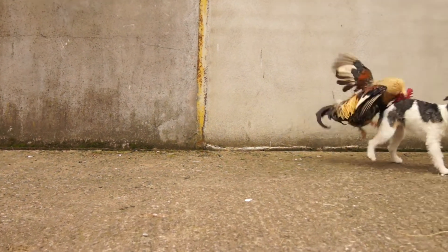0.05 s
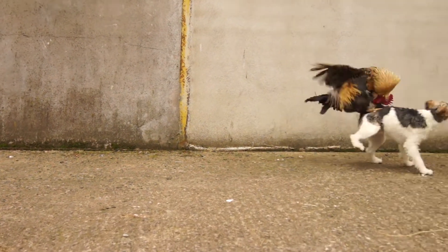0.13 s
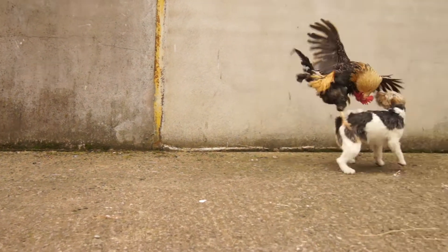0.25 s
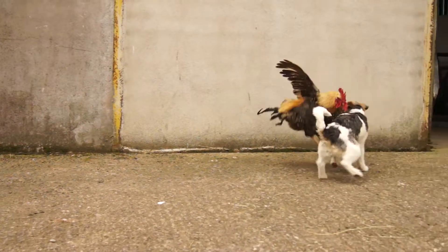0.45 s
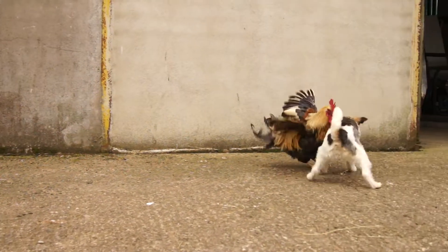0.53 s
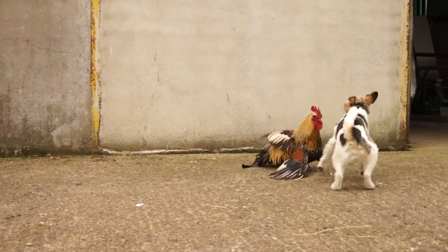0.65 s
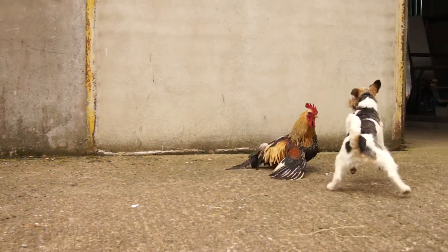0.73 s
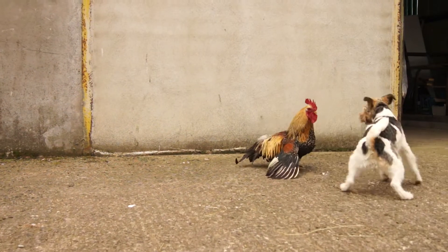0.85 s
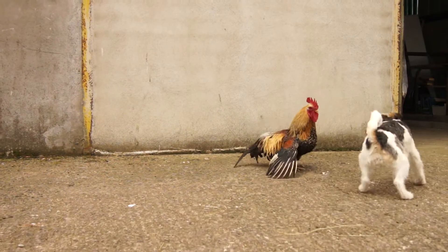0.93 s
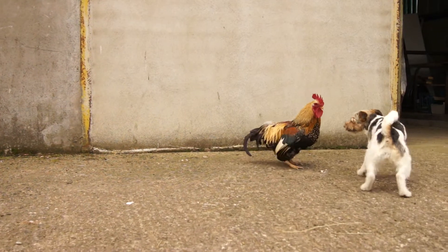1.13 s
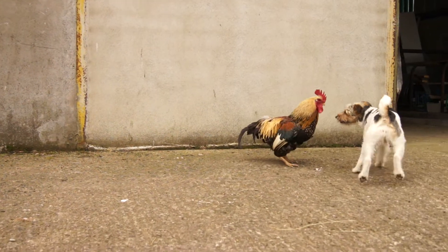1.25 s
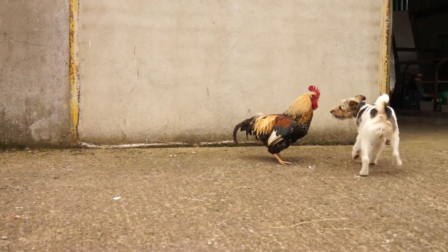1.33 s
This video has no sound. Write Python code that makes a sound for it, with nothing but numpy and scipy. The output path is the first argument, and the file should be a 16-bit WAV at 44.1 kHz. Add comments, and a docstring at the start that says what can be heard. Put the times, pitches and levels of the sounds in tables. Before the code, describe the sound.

A rooster's wings flap and slap sharply, then faint scuffling on concrete outdoors.

```python
"""A rooster leaps at a small dog in a concrete yard, heard on a stereo pair of microphones.
A soft wing beat leads to one sharp slap, a second blow and a landing thud: quills crack, cupped air
rings, wings and bodies thump. Feathers rustle, claws scuff the grit and one animal gives a tiny squeak.
Ground and walls echo the scuffle. Beyond it lie thin chirps, a high twitter, one far hoot and a hush."""
import sys
import numpy as np
from scipy import signal
from scipy.fft import rfft, irfft
from scipy.io import wavfile
from scipy.ndimage import uniform_filter1d

SR = 44100
rng = np.random.default_rng(int(sys.argv[2]) if len(sys.argv) > 2 else 0)


def materialize(psi):
    """Save the field psi as 16-bit PCM at rate SR to the path in sys.argv[1].

    A 1-D psi becomes a single channel; in a 2-D psi each row is a channel.
    """
    bounded = np.clip(np.atleast_2d(psi).T, -1, 1)
    quanta = np.round(bounded * 32767).astype(np.int16)
    wavfile.write(sys.argv[1], SR, quanta)


N = 61739

# wing slaps in the foreground: t/s, crack level/dB, attack/s, hold/s, release/s, relative ring level/dB
WING_SLAPS = [(0.2318, -20.5, .0002, .003, .0045, -23), (0.2706, -28.5, .003, .005, .0045, -41)]
# spectrum of cracking quills: f/Hz, level/dB
QUILL_SPECTRUM = [(150, -44.5), (400, 4), (900, -13), (1400, -5), (2300, -6), (4200, -4.5), (6500, -0.5),
                  (10000, -16.5), (13500, -4)]
# resonances of the air under the wing: f/Hz, width/Hz, relative level/dB
WING_CAVITY = [(505, 170, 2), (700, 98, 6.5), (1040, 280, -5.5), (1728, 155, 2), (2873, 93, 14.5),
               (4140, 200, 5.5), (4840, 100, 4)]
def wing_slaps():
    """Quills strike in a dense volley and ring the air cupped under the wing."""
    quills = unit(colour(spread(grains(per_s=9000, spread_db=4), width=.65), QUILL_SPECTRUM))
    crack = quills * strokes(row[:5] for row in WING_SLAPS)
    air = stereo_noise(width=.65)
    push = sum(undb(db) * envelope(s, attack=.0012, hold=.005, release=.002) for s, *_, db in WING_SLAPS)
    hollow = sum(undb(db) * ring(air * push, hz, width) for hz, width, db in WING_CAVITY)
    return crack + 2.78 * hollow


# sharp clicks within the slaps, quill snaps plus, at 0.2336 s, the first snap bouncing off the ground: t/s,
# relative level/dB
QUILL_SNAPS = [(0.2319, 0), (0.2336, 6), (0.2399, -2), (0.2753, -12)]
def quill_snaps():
    """The stiffest quills each snap with one hard click; the first snap comes back off the ground a moment
    later."""
    return colour(impulses(QUILL_SNAPS), QUILL_SPECTRUM)


# dull beats of wings and bodies: t/s, level/dB, f/Hz, hold/s, puff level/dB
BODY_THUMPS = [(0.149, -61, 396, 0.0099, -51), (0.195, -42, 367, 0.0018, -58),
               (0.2111, -45, 384, 0.0056, -33), (0.2386, -37, 480, 0.0028, -28),
               (0.2705, -32, 361, 0.0079, -35.5), (0.353, -45, 348, 0.0118, -50.5),
               (0.556, -42, 399, 0.01, -47.5), (0.662, -70, 385, 0.012, -75)]
# spectrum of the puff of air: f/Hz, level/dB
PUFF_SPECTRUM = [(25, -8.5), (55, -29), (110, -19), (170, -16), (240, 7.5), (400, 5), (570, -3.5), (720, 2),
                 (1300, -15), (3000, -23), (9000, -39)]
def body_thumps():
    """Each beat is a few uneven, sagging low cycles with a puff of air."""
    air = unit(colour(stereo_noise(), PUFF_SPECTRUM))
    wobble = 1 + .09 * walk(500)
    sag_per_s = 6
    out = 0
    for start, db, hz, hold, puff_db in BODY_THUMPS:
        t = np.maximum(since(start), 0)
        pitch = hz * wobble * np.exp(-sag_per_s * t) * (t > 0)
        beat = undb(db) * sine(pitch) + undb(puff_db) * air
        out += beat * envelope(start, attack=.002, hold=hold, release=.0022)
    return out


# rustles of the rooster's plumage: t/s, level/dB, attack/s, hold/s, release/s
RUSTLES = [(0.09, -50.5, 0.034, 0.11, 0.023), (0.214, -35, 0.0049, 0.0027, 0.0078),
           (0.282, -48.5, 0.0031, 0.01, 0.074), (0.335, -77, 0.019, 0.068, 0.068),
           (0.5545, -41.5, .001, 0.0044, 0.0059), (0.582, -55, 0.0067, 0.06, 0.016),
           (0.648, -52.5, 0.011, .012, 0.06), (0.87, -59.5, 0.0085, .12, 0.055),
           (1.145, -61.5, 0.0079, 0.024, 0.012), (1.278, -55, 0.0096, 0.026, 0.01)]
# spectrum of rubbing feathers: f/Hz, level/dB
FEATHER_SPECTRUM = [(100, -27.5), (200, -9.5), (370, 1), (480, -0.5), (580, -18), (740, 5.5), (1000, -2),
                    (1400, -14.5), (2000, -6.5), (2400, -19), (2900, -3), (3400, -12), (4300, -8),
                    (8000, -20), (13500, -25)]
def feathers():
    """Feathers slide over each other in fine, dense clicks."""
    return strokes(RUSTLES) * friction(FEATHER_SPECTRUM, per_s=12000, spread_db=1.5)


# scuffs across the yard floor: t/s, level/dB, attack/s, hold/s, release/s
CLAW_SCUFFS = [(0.005, -51, 0.0015, 0.0079, 0.018), (0.052, -51.5, 0.0012, .03, 0.014),
               (0.16, -52, .002, 0.0024, 0.0046), (0.372, -51.5, 0.0016, .004, 0.0073),
               (0.453, -49.5, 0.0025, 0.029, 0.0054), (0.486, -46, .001, 0.0024, 0.005),
               (0.510, -54.5, 0.0023, 0.0031, 0.025), (0.535, -56, 0.0016, 0.037, .006),
               (0.588, -59.5, .005, 0.044, 0.036), (0.649, -46.5, 0.0085, 0.024, 0.0097),
               (0.683, -54.5, 0.00072, 0.0014, 0.075), (0.805, -54, 0.0014, 0.0022, 0.0051),
               (0.905, -50.5, 0.00094, 0.011, .012), (1.01, -58.5, .004, 0.0083, 0.008),
               (1.283, -65, 0.0035, 0.0083, 0.0054)]
# single claw ticks: t/s, relative level/dB
CLAW_TICKS = [(0.162, -28), (0.454, -29), (0.4875, -22.5), (0.512, -25), (0.5405, -20), (0.5555, -31),
              (0.6275, -46), (0.6845, -31), (0.8065, -31), (0.907, -26)]
# spectrum of grit on concrete: f/Hz, level/dB
GRIT_SPECTRUM = [(120, -17), (300, 2), (1000, -23.5), (2400, -6), (3300, -7.5), (4200, 2), (5400, -4),
                 (6600, -2), (8500, -9.5), (11000, -9), (13500, -7.5)]
def claws():
    """Claws drag through the grit and tick on the concrete."""
    scuffs = strokes(CLAW_SCUFFS) * friction(GRIT_SPECTRUM, per_s=7600, spread_db=2.5)
    return scuffs + colour(impulses(CLAW_TICKS), GRIT_SPECTRUM)


def squeak():
    """One animal in the scuffle gives a tiny falling squeak."""
    return whistle(start=.6125, length=.019, hz=1016, glide_hz_per_s=-3000, db=-44, waver=.017)


# thin chirps around the yard: t/s, f/Hz, level/dB
CHIRPS = [(0.704, 4170, -41), (0.818, 4320, -52), (0.965, 4800, -59), (0.986, 4100, -62),
          (1.018, 4280, -68), (1.04, 4470, -62), (1.086, 4050, -61.5)]
def chirps():
    """A few short, high whistles, each sliding upward."""
    return sum(whistle(s, length=.016, hz=hz, glide_hz_per_s=9000, db=db, waver=.03)
               for s, hz, db in CHIRPS)


def hoot():
    """One faint, low hoot sinks in pitch, far from the microphones."""
    return whistle(start=.915, length=.075, hz=445, glide_hz_per_s=-300, db=-61, waver=.011)


def twitter():
    """Distant chirping, blurred by the surroundings into a flickering band of noise."""
    hz, width_hz = 4230, 1350
    voices = ring(ring(stereo_noise(), hz, width_hz), hz, width_hz)
    swell = envelope(start=.78, attack=.15, hold=.11, release=.04)
    return unit(voices) * undb(-57.5 + 3.5 * walk(70)) * swell


# reflections off ground and walls: delay/s, level/dB, extra delay at the left microphone/s
YARD_ECHOES = [(.0062, -12, .00005), (.0195, -19, .00008)]
# spectrum of the yard's reverberation: f/Hz, level/dB
YARD_SPECTRUM = [(60, -11), (160, 9.5), (240, 1), (330, -0.5), (460, 1), (580, 1.5), (720, 5.5),
                 (1000, 6.5), (1400, -2), (2000, -1.5), (2900, -6), (4500, -3), (9000, -4), (14000, -7.5)]
def yard(x):
    """Hard surfaces add two early reflections and a short diffuse tail to the direct sound."""
    t60_s, tail_db = .61, -9.5
    early = sum(undb(db) * np.array([delay(x[0], s + lag), delay(x[1], s)]) for s, db, lag in YARD_ECHOES)
    tail = stereo_noise() * envelope(0, attack=.0074, hold=0, release=t60_s / np.log(1000))
    tail = colour(unit(tail) / np.sqrt(N), YARD_SPECTRUM)
    return x + early + undb(tail_db) * signal.fftconvolve(x, tail, axes=1)[:, :N]


# spectrum of the open air around the yard: f/Hz, level/dB
HUSH_SPECTRUM = [(15, 6.5), (50, -11), (130, -14), (200, -12), (300, -12.5), (480, 1), (620, -9),
                 (800, 0.5), (1050, -0.5), (1350, -15), (1800, -3), (2000, -9.5), (2180, 3.5),
                 (2400, -29.5), (2600, -4.5), (2900, -7.5), (3450, -16), (3900, -8), (5000, -13.5),
                 (7500, -19.5), (10000, -22), (13500, -27.5)]
def hush():
    """Quiet outdoor air, wavering a little."""
    return undb(-54.5 + .54 * walk(23.8)) * unit(colour(stereo_noise(), HUSH_SPECTRUM))


# stereo width at the microphones, bass and treble: f/Hz, side minus mid level/dB
BASS_WIDTH = [(100, -19), (350, -20), (650, -16)]
TREBLE_WIDTH = [(1000, -3), (2000, 0), (5000, -1), (9000, 1), (14000, -3.5)]
def spread(pair, width=1):
    """Two unrelated signals as mid and side: left and right come out alike in the bass."""
    side = width * colour(pair[1], BASS_WIDTH + TREBLE_WIDTH)
    return np.array([pair[0] + side, pair[0] - side])


def stereo_noise(width=1):
    """Noise spread across both microphones."""
    return spread(rng.standard_normal((2, N)), width)


def grains(per_s, spread_db):
    """Two unrelated streams of dense clicks of uneven size."""
    size = undb(spread_db * np.minimum(rng.exponential(size=(2, N)), 4))
    polarity = np.sign(rng.standard_normal((2, N)))
    return size * polarity * (rng.random((2, N)) < per_s / SR)


def friction(spectrum, per_s, spread_db, catch_db=2):
    """Tiny clicks of surfaces that catch and slip unevenly."""
    clicks = spread(grains(per_s, spread_db)) * undb(catch_db * walk(250))
    return unit(colour(clicks, spectrum))


def whistle(start, length, hz, glide_hz_per_s, db, waver):
    """A short gliding tone that swells and fades."""
    t = np.clip(since(start), 0, length)
    pitch = (hz + glide_hz_per_s * (t - length / 2)) * (1 + waver * walk(900))
    return undb(db) * np.sin(np.pi * t / length) * sine(pitch)


def sine(hz):
    """A tone of rms 1 that follows a pitch curve."""
    return np.sqrt(2) * np.sin(2 * np.pi * np.cumsum(hz) / SR)


def impulses(rows):
    """One click for each (t/s, level/dB) row."""
    clicks = np.zeros(N)
    for s, db in rows:
        clicks[int(s * SR)] -= undb(db)
    return clicks


def envelope(start, attack, hold, release):
    """Linear rise, hold and exponential fall, timed in seconds."""
    t = since(start)
    return np.clip(t / attack, 0, 1) * np.exp(-np.maximum(t - attack - hold, 0) / release)


def strokes(rows):
    """One envelope for each row, summed at their levels."""
    return sum(undb(db) * envelope(s, attack, hold, release) for s, db, attack, hold, release in rows)


def walk(per_s):
    """Smooth random drift of rms 1."""
    step = max(int(SR / per_s), 1)
    stairs = np.repeat(rng.standard_normal(N // step + 1), step)
    return unit(uniform_filter1d(stairs, step)[:N])


def ring(x, hz, width):
    """One damped resonance, gain 1 at its centre."""
    return signal.lfilter(*signal.iirpeak(hz, hz / width, fs=SR), x)


BIN_HZ = np.fft.rfftfreq(2 * N, 1 / SR)
def colour(x, points):
    """Causal filter through (f/Hz, level/dB) points."""
    hz, db = np.array(points).T
    gains = undb(np.interp(np.log(BIN_HZ + 1), np.log(hz), db))
    cepstrum = irfft(np.log(gains))
    cepstrum[1:N] *= 2  # fold onto positive time for minimum phase
    cepstrum[N + 1:] = 0
    return irfft(rfft(x, 2 * N) * np.exp(rfft(cepstrum)))[..., :N]


def delay(x, seconds):
    """The same sound, later."""
    return irfft(rfft(x, 2 * N) * np.exp(-2j * np.pi * BIN_HZ * seconds))[..., :N]


def since(start):
    """Seconds since a moment."""
    return np.arange(N) / SR - start


def undb(db):
    """Decibels to gain."""
    return 10 ** (np.asarray(db) / 20)


def unit(x):
    """Scale to rms 1."""
    return x / np.sqrt(np.mean(x ** 2))


def scene():
    """The scuffle stands slightly to the right, so it reaches the left microphone a little later."""
    scuffle = feathers() + claws() + wing_slaps() + quill_snaps() + body_thumps() + squeak()
    left, right = yard(scuffle + hoot() + chirps())
    return np.array([delay(left, seconds=18e-6), right]) + hush() + twitter()


# response of the left microphone's port: f/Hz, level/dB
LEFT_MIC = [(400, 0), (700, 1.5), (2200, 0), (3600, 1), (9500, 1), (11200, -3), (12000, -20), (13000, -50)]
# bass response of both microphones: f/Hz, level/dB
MIC_BASS = [(50, 2), (75, -3), (110, -7), (170, -4), (250, 0), (400, 0)]
def record(dry):
    """Both microphones thin the upper bass and cut off the top; the left one dulls sooner."""
    cutoff_hz = 13700
    mics = colour(np.array([colour(dry[0], LEFT_MIC), dry[1]]), MIC_BASS)
    return signal.sosfilt(signal.ellip(8, .2, 70, cutoff_hz, fs=SR, output="sos"), mics)


dry = scene()
out = record(dry)
materialize(out)
```